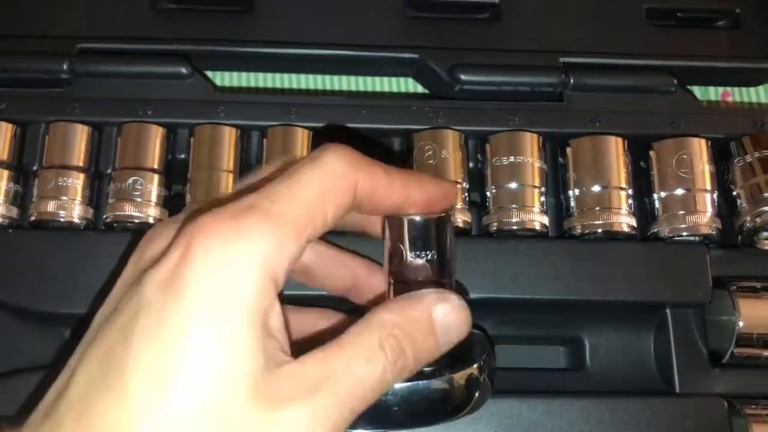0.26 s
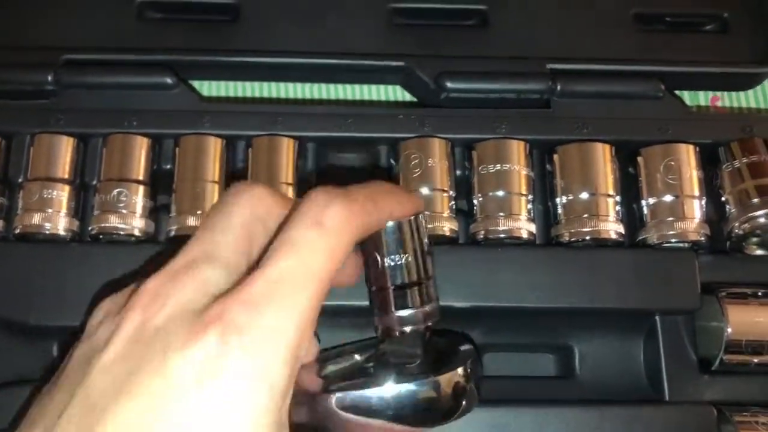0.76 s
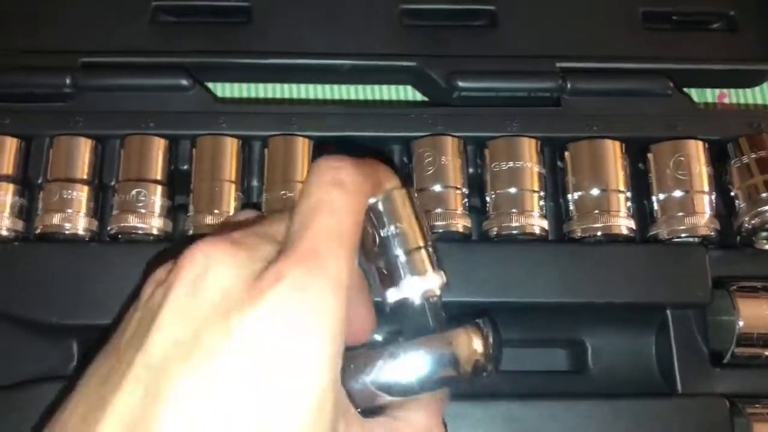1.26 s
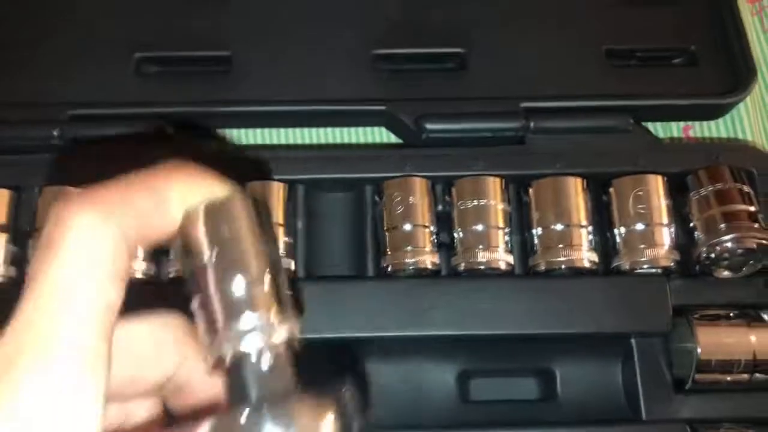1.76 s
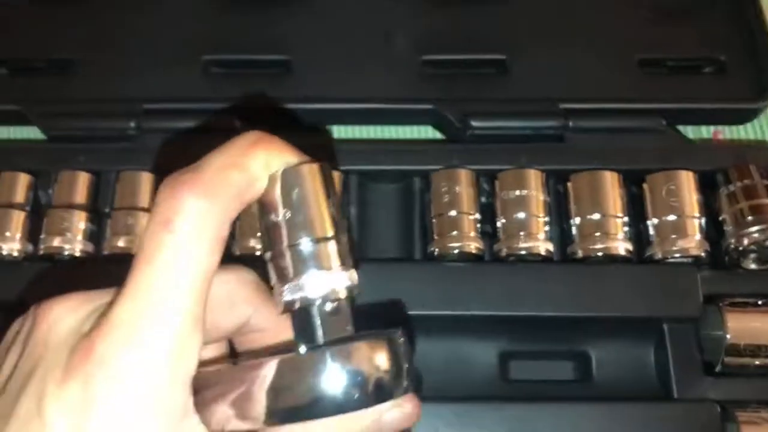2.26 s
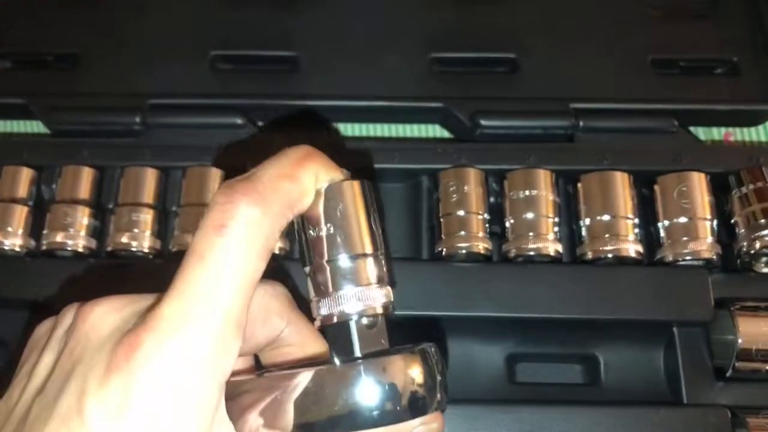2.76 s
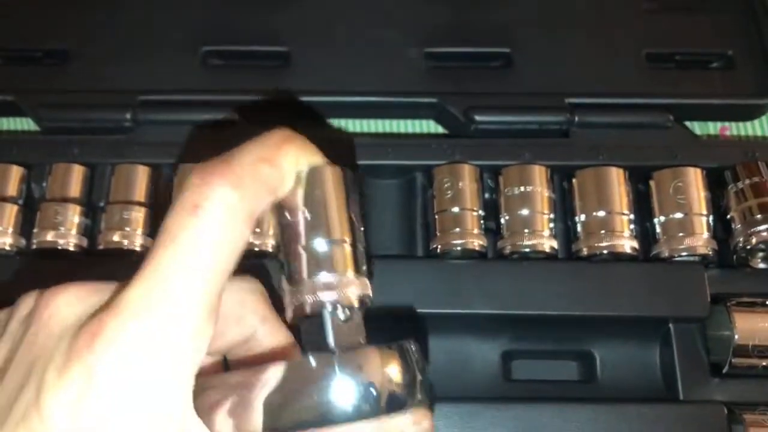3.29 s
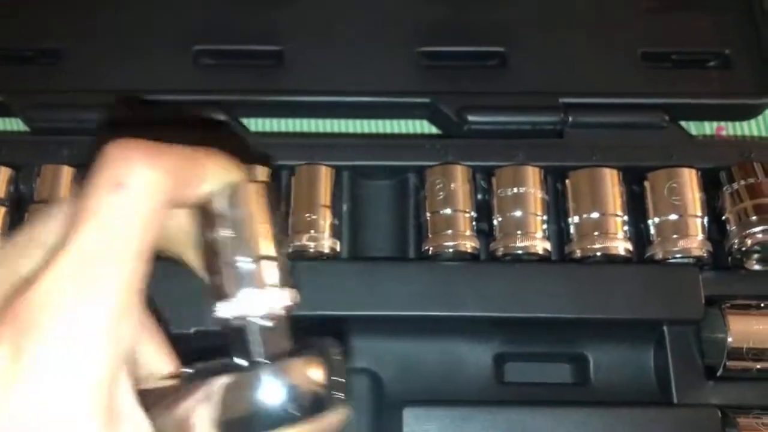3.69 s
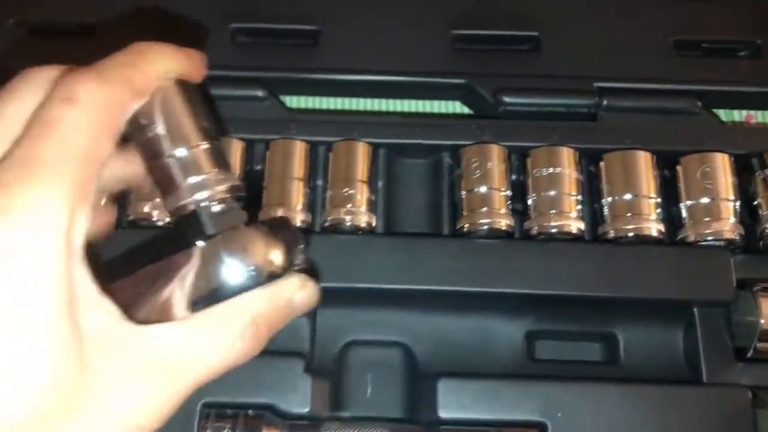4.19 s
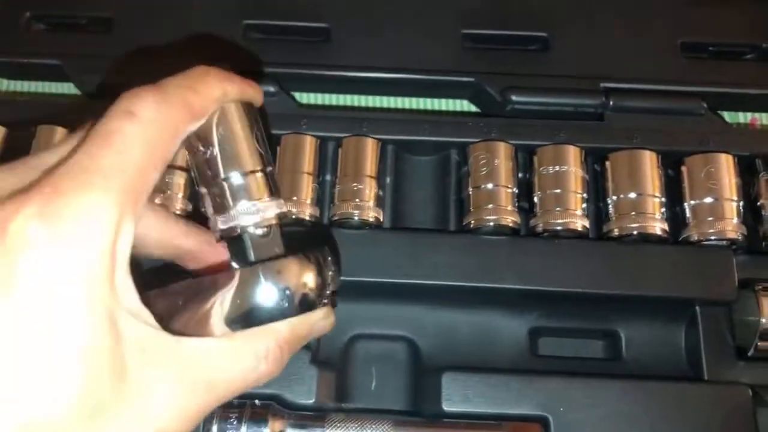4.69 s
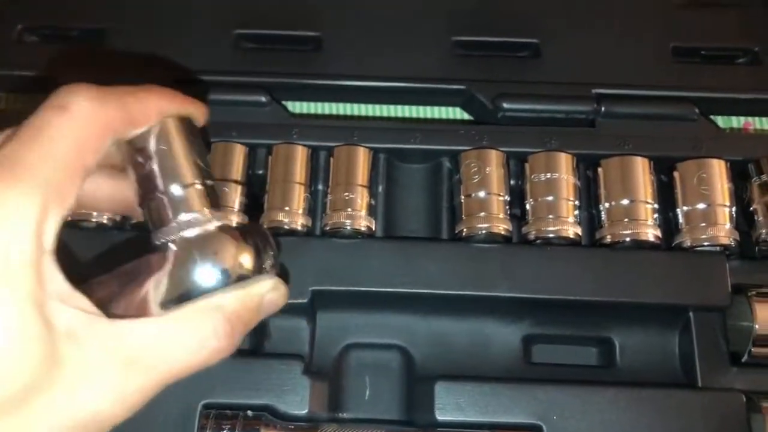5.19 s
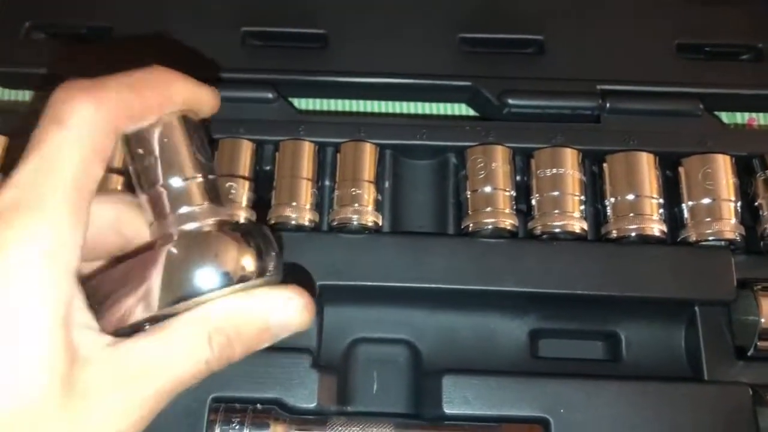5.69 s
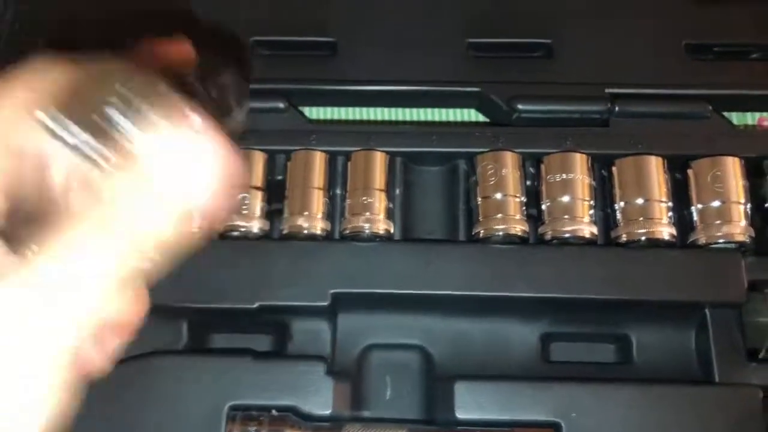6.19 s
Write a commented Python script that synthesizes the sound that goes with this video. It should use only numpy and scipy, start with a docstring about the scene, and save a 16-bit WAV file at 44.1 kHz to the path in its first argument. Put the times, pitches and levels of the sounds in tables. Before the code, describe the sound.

A quiet small room with faint hiss and lumpy low rumble, heard close on a phone microphone. From 0 to 1 s small metal clicks and short skids, busiest around 0.27 s and 0.8 to 0.97 s, lie over gritty steel-on-plastic scraping. Light case knocks follow at 1.0, 1.1, a brighter one at 1.3, and 1.5 s. A soft brushing slide runs about 1.75 to 2.1 s, with dull thumps near 2.15 and 2.5 s and a tiny tick at 2.7. Hollow, boxy knocks cluster at 3.03 s and more strongly at 3.73 s. Low dull clacks come at 4.5 to 4.62 s. A crisp, hard metal snap hits at 5.22 s, then a smaller pinging click at 5.74. At 6.16 s the loudest clatter strikes the case, bright with brief metallic ringing; a lesser knock at 6.27 and a faint tick at 6.43 end it.

```python
"""In a quiet room, a steel socket is fitted onto a ratchet above a hard plastic tool case.
Tool clicks and case knocks are noisy contact forces driving groups of damped modes, with a room tail.
Parts ring as decaying sines; dull table thumps are falling sines; rubs are gritty noise through modes.
Underneath lie low building rumble and a phone microphone's hiss, both shaped noise."""
import sys
import numpy as np
from scipy import signal
from scipy.fft import rfft, irfft, next_fast_len
from scipy.io import wavfile
from scipy.ndimage import map_coordinates

SR = 44100
rng = np.random.default_rng(int(sys.argv[2]) if len(sys.argv) > 2 else 0)


def master(y):
    """Save y as 16-bit WAV."""
    cut = np.clip(np.atleast_2d(y).T, -1, 1)
    pcm = np.round(cut * 32767)  # scale
    wavfile.write(sys.argv[1], SR, pcm.astype(np.int16))


N = 284445  # length of the scene, samples
LENGTH = 8192  # length of one contact or thump, samples


def amp(db):
    """Decibels to gain."""
    return 10 ** (np.asarray(db) / 20)


def unit(x):
    """Scaled to rms 1."""
    return x / np.sqrt(np.mean(x ** 2) + 1e-20)


def along(points, hz):
    """Reads a curve of (Hz, value) points on a log frequency axis."""
    f, value = np.transpose(points)
    return np.interp(np.log(hz + 1), np.log(f + 1), value)


def level(rows):
    """Gain per sample from a (s, dB) curve, at -120 dB outside it."""
    s, db = np.transpose(rows)
    return amp(np.interp(np.arange(N) / SR, s, db, -120, -120))


def wobble(rate):
    """A smooth random curve, rate knots a second."""
    knots = rng.standard_normal(int(N * rate / SR) + 4)
    return map_coordinates(knots, [np.arange(N) * rate / SR])


def filtered(x, response):
    """x shaped by a complex response of frequency."""
    m = next_fast_len(x.shape[-1] + 8192)
    spectrum = rfft(x, m) * response(np.fft.rfftfreq(m, 1 / SR))
    return irfft(spectrum, m)[..., :x.shape[-1]]


def resonances(modes):
    """Response of damped modes; a soft contact drives little above the last, highest one."""
    top = 1.294 * modes[-1][0]

    def response(f):
        softness = 1 / (1 - (f / top) ** 2 + 1j * f / top) ** 2
        total = 0
        for k, (centre, width, db) in enumerate(modes):
            mode = 1j * f * width / (centre * centre - f * f + 1j * f * width)
            total = total + (-1) ** k * amp(db) * mode  # neighbours have opposite sign
        return softness * total
    return response


def add(track, s, sound):
    """Mixes a sound into a track at a time."""
    spot = track[round(s * SR):][:len(sound)]
    spot += sound[:len(spot)]


def contacts(table, groups, groups_db, first_db, treble_loss, spread_db):
    """A sharp first blow and a chattering after-force; harder contacts favour higher mode groups."""
    track, t = np.zeros(N), np.arange(LENGTH) / SR
    for s, level_db, hardness, rise, t60 in table:
        # the chatter changes strength every 64 samples
        chatter = amp(3.5 * np.repeat(rng.standard_normal(LENGTH // 64), 64))
        grit = chatter * rng.standard_normal(LENGTH) * np.minimum(t / rise, 1) ** 2
        grit[round(rise * SR)] = amp(first_db)  # the first blow, one sample at the end of the rise
        for k, modes in enumerate(groups):
            # later bounces are softer, so the high modes fade first
            fade = amp(-60 * (1 + k * treble_loss) * np.maximum(t - rise, 0) / t60)
            ring = filtered(grit * fade, resonances(modes))
            group_db = level_db + groups_db[k] - spread_db * (k - hardness) ** 2
            add(track, s, amp(group_db) * ring / np.abs(ring).max())
    return track


# quick contacts, mostly of the tool, the slow-rising ones are short skids; hardness is the favoured mode group:
# start_s [s], level_db [dB before group balance], hardness [group index], rise_s [s],
# t60_s [s, force decay in the lowest group]
TOOL_CONTACTS = [(0.036, -46.5, 1, .0013, .02), (0.076, -40, -1.04, .0016, 0.01),
                 (0.198, -56.5, 1.1, .0009, 0.02), (0.258, -33.5, 0.53, .0085, 0.096),
                 (0.26, -46.5, 1, .003, 0.04), (0.27, -27, 0.1, .018, 0.024),
                 (0.284, -44, 1, 0.0033, 0.035), (0.323, -39.5, -0.5, .0009, 0.027),
                 (0.339, -42, -2, .0009, 0.016), (0.386, -56, 0.6, .001, 0.019),
                 (0.602, -37.5, -2, .0004, 0.02), (0.79, -41.5, 0.44, .0044, 0.48),
                 (0.807, -33, 0.4, .0028, 0.094), (0.925, -44, 0.6, .0068, 0.033),
                 (0.962, -34, .5, .0003, 0.0074), (1.865, -49, 0.33, 0.013, 0.096),
                 (2.123, -39, 1.3, .013, 0.0072), (2.141, -45, 0.5, .0022, 0.0079),
                 (2.699, -44.5, 1, .001, 0.018), (3.021, -34, 0.37, .0093, .01),
                 (3.721, -45.5, 1, .002, 0.014), (4.017, -59, 0.5, .0012, 0.042),
                 (4.281, -58, 0.2, .0007, .031), (4.497, -29.5, -1, .0007, 0.038),
                 (4.584, -34, -1.88, .0013, .033), (4.608, -23, -1.86, .0015, 0.0036),
                 (4.621, -22, -2.07, .0011, .018), (4.665, -54, -0.1, .0007, 0.016),
                 (4.793, -53, 0.9, .0009, 0.062), (4.806, -46, -0.1, .0018, 0.048),
                 (5.202, -55, 1.1, .0093, .03), (5.214, -29.5, 1.1, .0037, 0.051),
                 (5.219, -26.5, 2, 0.0019, 0.017), (5.22, -13, 0.91, .002, .011),
                 (5.224, -18, 0.75, .001, .013), (5.514, -61, .5, .0011, .024),
                 (5.725, -41, 1.2, .017, .026), (5.738, -31, 1.3, .0004, 0.046),
                 (5.776, -48.5, 1.2, .0009, 0.08), (5.812, -54, 0.8, .0008, 0.013),
                 (6.026, -55.5, 1.1, .0006, 0.018), (6.043, -48.5, 0.8, .0006, .014),
                 (6.143, -40, 0.2, .014, 0.025), (6.434, -46, 1.1, .0004, 0.045)]
# mode groups of the tool, low to high: centre_hz [Hz], width_hz [Hz], level_db [dB within the group]
TOOL_BODY_MODES = [(784, 100, 16), (953, 210, -16.5)]
TOOL_TICK_MODES = [(1574, 140, 7), (2065, 520, 1)]
TOOL_PING_MODES = [(2813, 53, -2), (3290, 420, -11)]
TOOL_EDGE_MODES = [(3850, 500, -14.5), (5120, 230, -0.5), (5130, 510, -3.5), (6500, 1800, -20.5),
                   (10150, 3300, -35)]


def tool_clicks():
    """Quick contacts and skids, mostly of the tool, excite its modes."""
    groups = [TOOL_BODY_MODES, TOOL_TICK_MODES, TOOL_PING_MODES, TOOL_EDGE_MODES]
    return contacts(TOOL_CONTACTS, groups, groups_db=[0, -0.5, -1.5, 0],
                    first_db=18.5, treble_loss=.05, spread_db=5)


# blows on the case; hardness is the favoured mode group: start_s [s], level_db [dB before group balance],
# hardness [group index], t60_s [s, force decay in the lowest group]
CASE_BLOWS = [(0.993, -31.5, .6, 0.033), (1.018, -42, .8, .035), (1.107, -32.5, .7, 0.026),
              (1.323, -23.5, 1.34, 0.12), (1.543, -28.5, .8, 0.015), (1.689, -44.5, 0.77, 0.038),
              (2.136, -34.5, 0.81, 0.023), (2.485, -56, 0.3, 0.02), (3.029, -17, 0.51, 0.038),
              (3.036, -23, 1.1, 0.03), (3.061, -23, 0.69, 0.048), (3.075, -31, 0.45, 0.024),
              (3.091, -35.5, 0.55, 0.13), (3.111, -36, 0.7, 0.026), (3.729, -15.5, 0.85, 0.12),
              (3.741, -16, 1.02, 0.028), (3.755, -30, 1.4, .046), (3.763, -20.5, 0.75, 0.015),
              (3.77, -21, 1, 0.051), (3.783, -29.5, 1.3, 0.034), (3.812, -40, 1.33, 0.035),
              (5.285, -40.5, .3, 0.013), (6.158, -12, 1.87, 0.053), (6.163, -13, 1.07, 0.091),
              (6.172, -14.5, 1.02, 0.032), (6.181, -14, 1.4, 0.028), (6.263, -21.5, 1.06, 0.037),
              (6.274, -28, 1.3, 0.024)]
# mode groups of the plastic case, low to high: centre_hz [Hz], width_hz [Hz], level_db [dB within the group]
CASE_BOOM_MODES = [(99, 27, -7), (159, 100, -1.5), (230, 130, -0.5), (333, 75, -1)]
CASE_SHELL_MODES = [(366.7, 41, 6), (429, 86, 16.5), (680, 94, -5), (724, 37, -1), (1004, 310, 8.5)]
CASE_RATTLE_MODES = [(1304, 120, -8), (1667, 110, -9), (1916, 95, -9.5), (2300, 480, -17.5)]
CASE_EDGE_MODES = [(3000, 250, -15.5), (3300, 202, -3.5), (4300, 530, -18.5), (5150, 300, -24),
                   (5800, 500, -30.5)]
KNOCK_RISE_S = .0008


def case_knocks():
    """Blows with one short rise time excite the boom, shell, rattle and edges of the case."""
    blows = [(s, db, hardness, KNOCK_RISE_S, t60) for s, db, hardness, t60 in CASE_BLOWS]
    groups = [CASE_BOOM_MODES, CASE_SHELL_MODES, CASE_RATTLE_MODES, CASE_EDGE_MODES]
    return contacts(blows, groups, groups_db=[-0.5, 1, 1.0, -1.5],
                    first_db=18.0, treble_loss=0.074, spread_db=6)


# ringing parts, from brief pings to half-second rings, a pair of tables each;
# modes: pitch_hz [Hz, at the start], level_db [dB re the blow], t60_s [s];
# blows that set the part ringing: start_s [s], level_db [dB]
LID_MODES, LID_HITS = [(490, 0, .48)], [(3.04, -41.5), (3.75, -41), (6.16, -32)]
HANDLE_MODES, HANDLE_HITS = [(846, 0, .29)], [(5.224, -35.5)]
COLLAR_MODES, COLLAR_HITS = [(4500, -2, 0.057), (4500, -18, .04), (11600, -34, .15)], [(0.283, -46), (0.966, -46.5), (1.113, -61)]
SOCKET_MODES, SOCKET_HITS = [(4540, 0, .21), (4425, -3.5, 0.36), (6300, -16, .11)], [(1.321, -54)]
LOOSE_MODES, LOOSE_HITS = [(6280, -0.5, 0.13), (6600, -20.5, 1.9), (8600, -16.5, .15), (11250, -25.5, .15)], [(6.159, -47)]
NEIGHBOUR_MODES, NEIGHBOUR_HITS = [(3530, -10.5, 0.29), (4370, -1, .21)], [(6.16, -44.5), (6.195, -40)]
PAWL_MODES, PAWL_HITS = [(2871, 5.5, 0.026), (2210, -15, 0.018)], [(2.699, -48.5), (4.499, -59.5), (4.795, -52), (5.206, -47),
                                       (5.736, -38), (5.776, -47.5), (5.81, -54.5), (6.026, -52),
                                       (6.043, -52), (6.433, -37)]
GRIP_MODES, GRIP_HITS = [(879, 0, 0.08)], [(0.04, -44), (0.932, -37), (6.434, -51)]
EXTENSION_MODES, EXTENSION_HITS = [(2620, 0.00053, 0.5)], [(3.75, -64), (5.224, -63.5), (6.159, -35)]
COLLAR_GLIDE = 1.6  # the collar's pitch climbs as it seats, share of its start pitch per second


def ringing():
    """Modes ring as decaying sines, all slightly unsteady together."""
    track, t = np.zeros(N), np.arange(SR // 2) / SR  # each ring lasts half a second at most
    parts = [(LID_MODES, LID_HITS, 0), (HANDLE_MODES, HANDLE_HITS, 0),
             (COLLAR_MODES, COLLAR_HITS, COLLAR_GLIDE), (SOCKET_MODES, SOCKET_HITS, 0),
             (LOOSE_MODES, LOOSE_HITS, 0), (NEIGHBOUR_MODES, NEIGHBOUR_HITS, 0),
             (PAWL_MODES, PAWL_HITS, 0), (GRIP_MODES, GRIP_HITS, 0),
             (EXTENSION_MODES, EXTENSION_HITS, 0)]
    onset = 1 - np.exp(-t / 0.00087)
    for modes, hits, glide in parts:
        for s, hit_db in hits:
            for hz, db, t60 in modes:
                cycles = hz * t * (1 + glide * t / 2) + rng.random()
                decay = amp(hit_db + db - 60 * t / t60)
                add(track, s, decay * onset * np.sin(2 * np.pi * cycles))
    return track * amp(1.2 * wobble(40))


# dull thumps through the table: start_s [s], tap_db [dB], sway_db [dB],
# drop_hz [Hz, start pitch above the settled pitch], sway_s [s, sway length]
TABLE_THUMPS = [(1.615, -50, -49, 400, 0.041), (1.652, -48, -43, 398, 0.062), (1.762, -41, -39, 355, 0.039),
                (1.995, -38.5, -71, 358, 0.033), (2.146, -29.5, -73, 480, .05),
                (2.307, -46, -38, 390, 0.05), (2.485, -27, -42, 340, 0.048), (3.041, -48, -44, 298, .06),
                (3.65, -37, -42, 450, 0.027), (3.695, -44, -34, 476, 0.035),
                (4.171, -50.5, -55, 348, 0.037), (4.265, -32, -32, 430, 0.034),
                (5.281, -34.5, -41, 443, 0.069), (5.598, -63, -43.5, 398, 0.033),
                (6.082, -36, -37, 420, 0.031), (6.131, -43, -51, 463, 0.065),
                (6.28, -25.5, -38.5, 450, 0.021), (6.387, -37.5, -42.5, 423, 0.032)]
SWAY_HZ = 62.3  # the pitch a thump settles to


def thumps():
    """A bending wave in the table top: high pitches arrive first as a tap, low ones lag as a short sway."""
    track, t = np.zeros(N), np.arange(LENGTH) / SR
    tap = amp(-60 * t / 0.043) * np.minimum(t / 0.0015, 1) ** 2
    for s, tap_db, sway_db, drop_hz, length in TABLE_THUMPS:
        pitch_hz = SWAY_HZ + drop_hz * np.exp(-t / 0.00547)
        wave = np.sin(2 * np.pi * np.cumsum(pitch_hz) / SR)
        sway = np.sin(np.pi * np.minimum(t / length, 1)) ** 0.62
        add(track, s, (amp(tap_db) * tap + amp(sway_db) * sway) * wave)
    return track


def strokes(rows, swell, fade):
    """Gain of strokes that swell to a peak and fade, at steady rates in dB a second, summed in power."""
    t = np.arange(N) / SR
    power = 0
    for s, db in rows:
        below_peak_db = np.where(t < s, swell * (s - t), fade * (t - s))
        power = power + amp(db - below_peak_db) ** 2
    return np.sqrt(power)


def rub(modes, grain_db):
    """Gritty friction force through the resonances of the plastic, at rms 1."""
    force = rng.standard_normal(N) * amp(grain_db * wobble(170))
    return unit(filtered(force, resonances(modes)))


# strokes of steel dragged on plastic: peak_s [s], level_db [dB]
SCRAPE_STROKES = [(.06, -56.5), (.2, -60), (.31, -55.5), (.42, -70.5), (.7, -52.5), (.85, -48.5),
                  (.97, -50), (1.14, -49.5), (1.32, -58.5), (6.08, -64), (6.14, -58.5), (6.28, -51),
                  (6.44, -62.5)]
# plastic under the steel: centre_hz [Hz], width_hz [Hz], level_db [dB, relative]
SCRAPED_PLASTIC = [(575, 540, 8), (1120, 560, 4.5), (1520, 114, 7), (2400, 490, -5), (2710, 170, -11)]
SCRAPE_SWELL_DB_PER_S, SCRAPE_FADE_DB_PER_S = 200, 196.5


def steel_scrape():
    """Steel drags on plastic: coarse friction noise in strokes that swell and fade."""
    gain = strokes(SCRAPE_STROKES, SCRAPE_SWELL_DB_PER_S, SCRAPE_FADE_DB_PER_S)
    return gain * rub(SCRAPED_PLASTIC, grain_db=3.0)


# strokes of a sleeve along the case: peak_s [s], level_db [dB]
SLEEVE_STROKES = [(1.755, -53.5), (1.83, -50), (1.92, -51)]
# case under the sleeve: centre_hz [Hz], width_hz [Hz], level_db [dB, relative]
BRUSHED_PLASTIC = [(708, 135, 12), (1410, 205, 7), (2020, 57, -6), (2320, 56, -7.5), (2690, 50, -16.5),
                   (3040, 93, -15.5)]
SLIDE_SWELL_DB_PER_S, SLIDE_FADE_DB_PER_S = 300, 57


def sleeve_brush():
    """A sleeve brushes the case: smoother friction noise that swells fast and fades slowly."""
    gain = strokes(SLEEVE_STROKES, SLIDE_SWELL_DB_PER_S, SLIDE_FADE_DB_PER_S)
    return gain * rub(BRUSHED_PLASTIC, grain_db=1.5)


# decay of the room: pitch_hz [Hz], t60_s [s]
ROOM_DECAY = [(150, 0.2), (1000, 0.2), (4000, 0.14), (12000, 0.13)]


def room(x):
    """A diffuse noise tail in which each frequency dies at its own speed."""
    hz, t, z = signal.stft(rng.standard_normal(SR // 2), SR, nperseg=256)
    decay = amp(-60 * t / along(ROOM_DECAY, hz)[:, None])
    tail = signal.istft(z * decay, SR, nperseg=256)[1]
    delayed = np.pad(x, (200, 0))  # samples before the tail begins
    return signal.fftconvolve(delayed, tail / np.linalg.norm(tail))[:N]


# loudness curve of the rumble: time_s [s], level_db [dB before the random wobble]
RUMBLE_LEVEL = [(0, -54.5), (0.8, -56), (1.0, -53), (1.42, -57), (1.8, -51), (2.23, -59.5), (2.55, -54.5),
                (2.85, -55.5), (3.6, -57.5), (3.84, -52), (4.24, -59.5), (4.65, -55.5), (4.94, -57),
                (5.23, -51), (5.43, -57.5), (6.05, -54), (6.23, -40.5), (6.45, -59)]
# spectrum of the rumble: pitch_hz [Hz], density_db [dB per Hz, relative]
RUMBLE_SPECTRUM = [(12, -53.5), (20, -20.5), (54, 1.5), (97, -7.5), (161, -2), (188, -2.5), (227, -3.5),
                   (293, -13), (330, -21), (430, -53.5), (730, -120)]
# spectrum of the hiss: pitch_hz [Hz], density_db [dB per Hz, relative]
HISS_SPECTRUM = [(200, -18.5), (330, 3.5), (500, -0.5), (800, -3), (1200, -7.5), (1800, -11), (2500, -16),
                 (4000, -18), (8000, -23.5), (16000, -29.5)]
HISS_DB = -70.5  # rms, before the band limit


def background():
    """Lumpy rumble of the building under a smooth hiss, both noise shaped by a spectrum."""
    white = rng.standard_normal((2, N))
    rumble = unit(filtered(white[0], lambda hz: amp(along(RUMBLE_SPECTRUM, hz))))
    hiss = unit(filtered(white[1], lambda hz: amp(along(HISS_SPECTRUM, hz))))
    lumps = amp(2.2 * wobble(14))
    return level(RUMBLE_LEVEL) * lumps * rumble + amp(HISS_DB) * hiss


def scene():
    """Clicks and knocks with their room tail, thumps, ringing, friction and background."""
    clicks, knocks = tool_clicks(), case_knocks()
    tail = amp(-15.0) * room(clicks) + amp(-11.5) * room(knocks)
    hits = clicks + knocks + tail + thumps() + ringing()
    friction = steel_scrape() + sleeve_brush()
    return (hits + friction + background())[None]


TOP_HZ = 15750  # band limit of the microphone chain


def record(dry):
    """The microphone chain keeps nothing above its band limit."""
    return filtered(dry, lambda hz: hz < TOP_HZ)


dry = scene()
out = record(dry)
master(out)
```